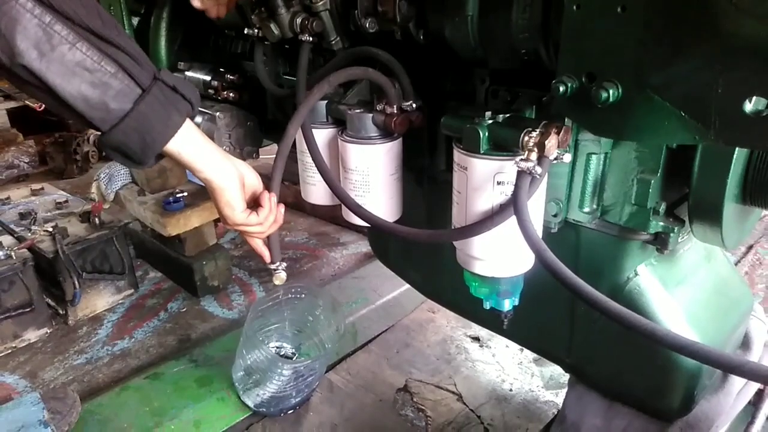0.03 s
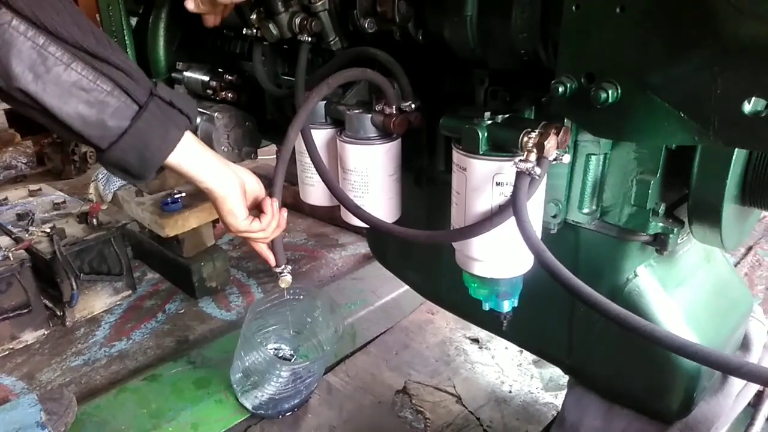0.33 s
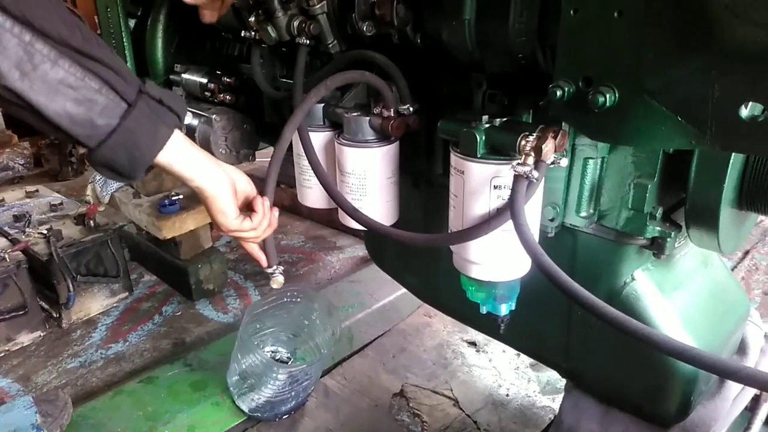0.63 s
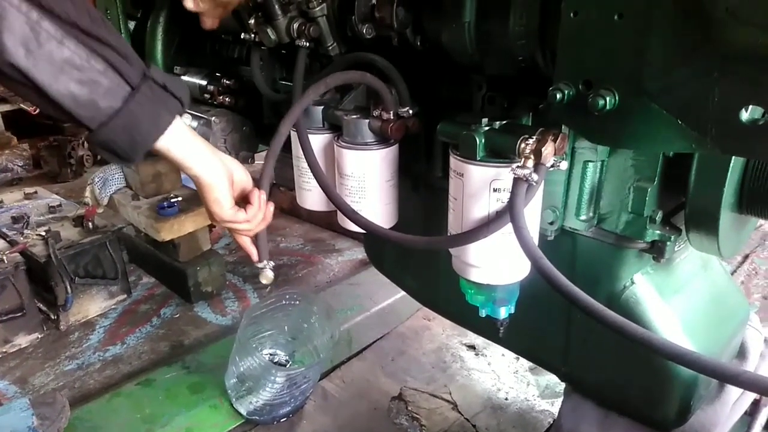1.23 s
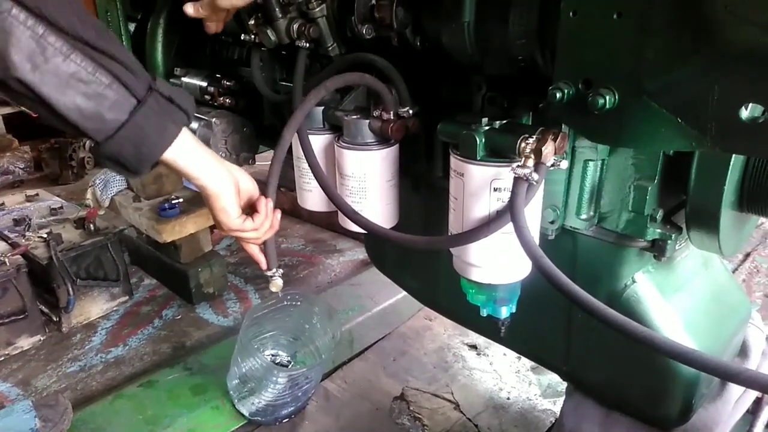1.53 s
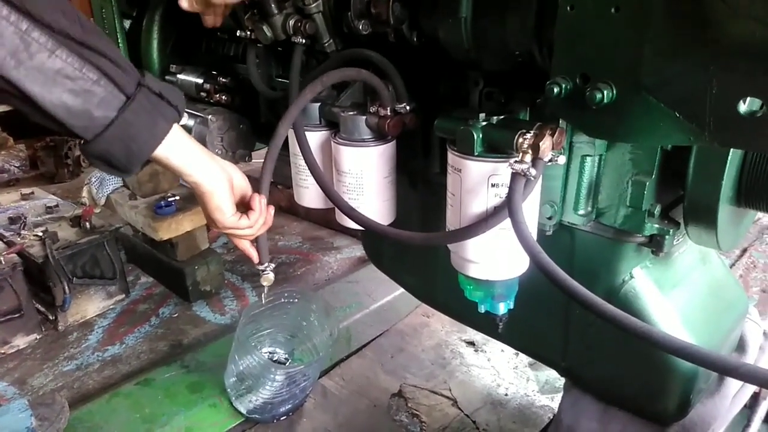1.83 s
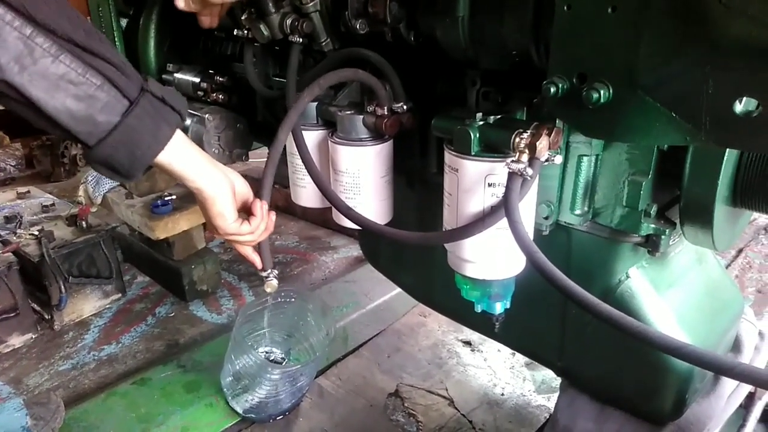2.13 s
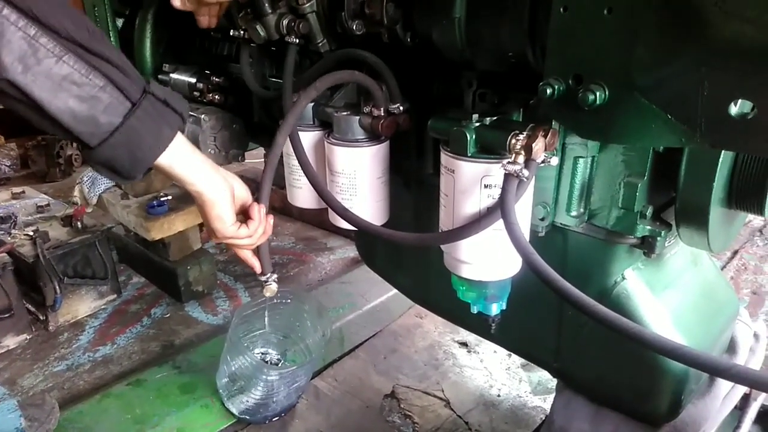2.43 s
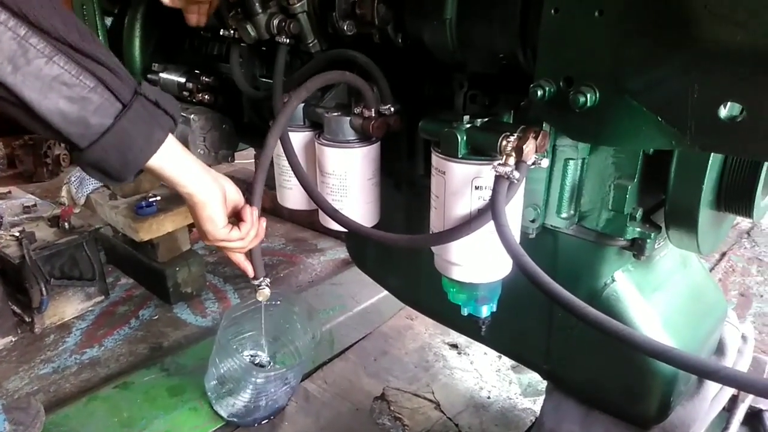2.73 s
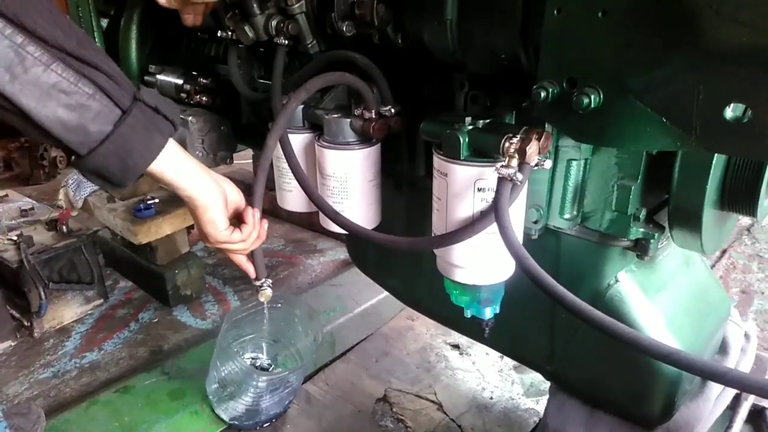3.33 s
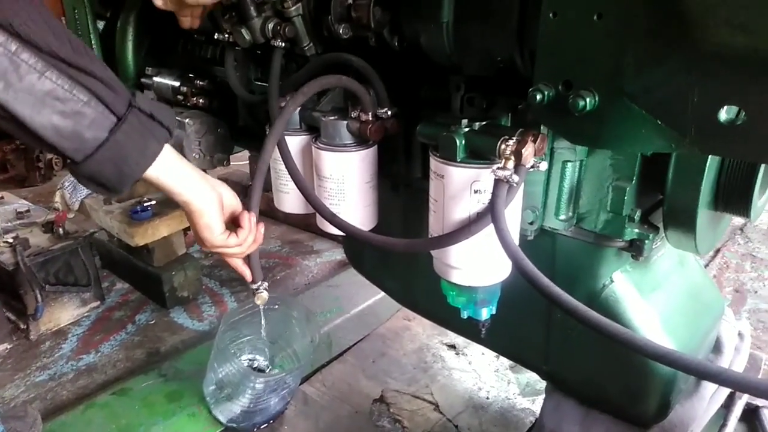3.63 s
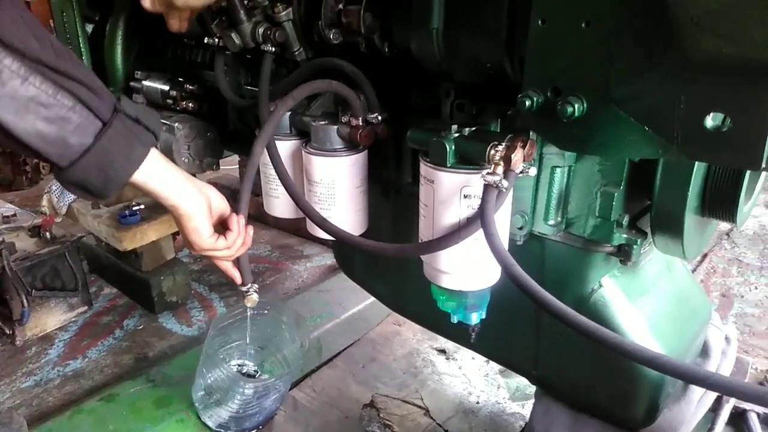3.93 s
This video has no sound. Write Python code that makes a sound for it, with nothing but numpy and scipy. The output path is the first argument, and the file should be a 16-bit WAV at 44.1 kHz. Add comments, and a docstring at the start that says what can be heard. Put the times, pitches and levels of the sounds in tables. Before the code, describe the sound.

Fuel sputters out of a hose into a nearby plastic bottle, first as soft drips, then as louder spits and pattering, gurgling gushes. A hand pump clicks and clunks throughout, over a workshop's faint low rumble.

```python
"""A hand pump sends fuel through a hose into a plastic bottle, beside a stopped engine in a workshop. The pump
clicks and clunks at each stroke, and now and then the bottle's body knocks. At first drops fall among faint
fizzes and small pops; after two seconds the hose spits loudly and the stream drums on the thin bottle. A low
rumble fills the room. All sit in the centre of the stereo image: the bottle close and dry, the pump with the
most room on it."""
import sys
import numpy as np
from scipy import signal
from scipy.fft import rfft, irfft, next_fast_len
from scipy.io import wavfile
from scipy.ndimage import uniform_filter1d

SR = 44100
rng = np.random.default_rng(int(sys.argv[2]) if len(sys.argv) > 2 else 0)


def pcm_store(signal):
    """Save signal as 16-bit PCM."""
    levels = np.round(np.clip(np.atleast_2d(signal), -1, 1) * 32767)
    wavfile.write(sys.argv[1], SR, levels.astype(np.int16).T)


N = 176400
TIME, AGE = np.arange(N) / SR, np.arange(SR // 2) / SR  # seconds into the scene, into one short sound
PEAK_S = .12  # age at which a short sound's envelope peaks
SPIT_RISE_S, DROPLET_FALL_S = .0008, .0011
BUBBLE_WOBBLE, GLIDE_PER_S = .059, 2  # as fractions of a bubble's pitch


def amp(db):
    """Decibels to gain."""
    return 10 ** (np.asarray(db) / 20)


def unit(x):
    """Scale to rms 1."""
    return x / np.sqrt(np.mean(x ** 2) + 1e-20)


def level(x, size):
    """Running rms over size samples."""
    return np.sqrt(np.abs(uniform_filter1d(x ** 2, size)) + 1e-20)


def along(points, hz):
    """Interpolate (Hz, value) points on a log frequency axis."""
    f, v = np.transpose(points)
    return np.interp(np.log(hz + 1), np.log(f + 1), v)


def curves(rows):
    """One value per sample for each column after the time."""
    s, *columns = np.transpose(rows)
    return [np.interp(TIME, s, column) for column in columns]


def coloured(x, points):
    """Minimum-phase filter with the gain of (Hz, dB) points."""
    m = 2 * next_fast_len(len(x))
    cepstrum = irfft(np.log(amp(along(points, np.fft.rfftfreq(m, 1 / SR)))))
    cepstrum[1:m // 2] *= 2
    cepstrum[m // 2 + 1:] = 0
    return irfft(rfft(x, m) * np.exp(rfft(cepstrum)))[:len(x)]


def add(track, s, db, sound):
    """Mix in a sound that peaks at time s, with its loudest 3 ms at db."""
    start = round((s - PEAK_S) * SR)
    sound = (amp(db) * sound / level(sound, size=132).max())[max(-start, 0):]
    part = track[max(start, 0):][:len(sound)]
    part += sound[:len(part)]


def envelope(rise_s, fall_s):
    """Exponential swell up to the peak, then exponential decay."""
    return np.exp(np.minimum((AGE - PEAK_S) / rise_s, (PEAK_S - AGE) / fall_s))


def wavering(hz, wobble, length):
    """Phase of a tone whose pitch trembles."""
    tremble = unit(uniform_filter1d(rng.standard_normal(length), size=30))
    return 2 * np.pi * np.cumsum(hz * (1 + wobble * tremble)) / SR


def room_tone(hum_hz=294, hum_db=-72.5, hiss_db=-70.5):
    """The workshop's background: a swelling low rumble, a faint hum and an even hiss."""
    swells = [(0, -56.5), (.73, -56), (1.15, -66), (1.3, -56.5), (1.62, -64), (1.78, -49), (2.1, -54.5),
              (4, -61)]  # course of the rumble: time_s, level_db
    rumble_spectrum = [(20, -20.5), (88, 3.5), (120, -1), (220, -15.5), (320, -23), (800, -57)]  # frequency_hz, gain_db
    hiss_spectrum = [(600, -6.5), (4500, -12), (14000, -15)]  # frequency_hz, gain_db
    db, = curves(swells)
    rumble = coloured(rng.standard_normal(N), rumble_spectrum)
    hum = amp(hum_db) * np.sin(2 * np.pi * hum_hz * TIME)
    hiss = amp(hiss_db) * unit(coloured(rng.standard_normal(N), hiss_spectrum))
    return amp(db) * rumble / level(rumble, size=9000) + hum + hiss


def in_room(x, wet_db, size=8820):
    """Direct sound reaches the microphone centred, with ever-changing echoes, wide only in the treble."""
    reverb_times = [(1500, 0.29), (6000, 0.26), (15000, 0.21)]  # decay of the workshop: frequency_hz, t60_s
    width = [(3000, -60), (4200, -18), (13000, -8)]  # stereo spread of the echoes: frequency_hz, side_db
    wet = np.zeros((2, N + SR))
    for start in range(0, N, size):  # each block gets new tails
        hz, t, noise = signal.stft(rng.standard_normal((2, len(AGE))), SR, nperseg=256)
        decay = amp(-60 * t / along(reverb_times, hz)[:, None])
        tails = signal.istft(noise * decay, SR, nperseg=256)[1][:, :len(AGE)]
        tails *= np.minimum(AGE / .001, 1)
        echo = signal.fftconvolve(x[None, start:start + size], tails / np.linalg.norm(tails[0]), axes=1)
        wet[:, start:start + echo.shape[1]] += amp(wet_db) * echo
    mid, side = wet[0, :N], coloured(wet[1, :N], width)
    return np.array([x + mid + side, x + mid - side])


def gurgle(count=700, size=2600, range_hz=(210, 490), fall_s=.007):
    """A crowd of large bubbles, each with its own rising pitch, at an even level."""
    jitter, pitch, gain = np.hsplit(rng.random((count, 3)), 3)
    hz, t = np.interp(pitch, [0, 1], range_hz), AGE[:size]
    tones = gain * t * np.exp(-t / fall_s) * np.sin(2 * np.pi * hz * t * (1 + GLIDE_PER_S * t / 2))
    at = ((np.arange(count)[:, None] + jitter) * N / count).astype(int) + np.arange(size)
    crowd = np.bincount(at.ravel(), tones.ravel(), N)[:N]
    return crowd / level(crowd, size)


def drumming(drops_per_s=160, rise_s=.03):
    """Each gush patters on the bottle, ringing its low modes, and churns the fuel inside."""
    modes = [(247, 16, 0), (320, 14, 5.5), (400, 15, -8), (448, 20, -14)]  # bottle resonances: pitch_hz, width_hz, gain_db
    gushes = [(1.778, -49.5, 0.044, -19), (2.106, -40.5, 0.11, -15), (2.333, -41, 0.12, -8),
              (2.766, -36, 0.053, -16), (2.919, -51, 0.074, -13), (3.146, -52, 0.12, -14),
              (3.32, -40.5, 0.065, -10), (3.652, -50.5, 0.05, -5), (3.809, -45.5, 0.26, -3.5),
              (3.987, -41, 0.14, 1)]  # surges of fuel: peak_s, level_db, decay_s, gurgle_over_drumming_db
    drops = (rng.random(N) < drops_per_s / SR) * rng.exponential(size=N)
    f = np.fft.rfftfreq(N, 1 / SR)
    body = sum((-1) ** k * amp(db) * 1j * f * width / (hz * hz - f * f + 1j * f * width)
               for k, (hz, width, db) in enumerate(modes))
    ring = irfft(rfft(drops) * body, N)
    s, db, fall_s, gurgle_db = np.transpose(gushes)[:, :, None]
    flow = amp(db) * np.exp(np.minimum((TIME - s) / rise_s, (s - TIME) / fall_s))
    flow /= np.hypot(1, amp(gurgle_db))  # patter and churn share the power
    patter = np.linalg.norm(flow, axis=0) * ring / level(ring, size=2600)
    churn = np.linalg.norm(flow * amp(gurgle_db), axis=0) * gurgle()
    return patter + churn


def bubble(hz, rise_s, fall_s, wobble=BUBBLE_WOBBLE):
    """A short trembling tone that rises as the bubble nears the surface."""
    gliding_hz = hz * (1 + GLIDE_PER_S * (AGE - PEAK_S))
    return envelope(rise_s, fall_s) * np.sin(wavering(gliding_hz, wobble, len(AGE)))


def plops():
    """Heavy drops fall in the bottle, each trapping one large bubble."""
    drops = [(0.15, 317.7, -50), (0.925, 418.6, -48.5), (0.956, 366, -48.5), (2.313, 390, -45.5),
             (2.701, 407, -49.5), (3.444, 430, -44), (3.55, 770, -59.5)]  # peak_s, pitch_hz, level_db
    out = np.zeros(N)
    for s, hz, db in drops:
        add(out, s, db, bubble(hz, rise_s=.0068, fall_s=.014, wobble=.16))
    return out


def pops():
    """Small bubbles pop and ring."""
    bubbles = [(0.093, 3420, -59), (0.443, 8450, -51.5), (1.288, 9700, -50.5), (1.913, 8650, -53),
               (2.016, 3020, -56.5), (2.183, 4640, -41), (2.7382, 3203, -28), (3.071, 4150, -47.5),
               (3.149, 9850, -52), (3.302, 3346, -38), (3.405, 3485, -39.5), (3.759, 2435, -50.5)]  # peak_s, pitch_hz, level_db
    out = np.zeros(N)
    for s, hz, db in bubbles:
        add(out, s, db, bubble(hz, rise_s=.0028, fall_s=.0045))
    return out


def squeak(octave_db=3):
    """Air squeaks through the wet hose end: a rough rising whistle with its octave."""
    whistle = [(2.95, 3324, -67.5), (2.985, 4050, -46), (3.02, 4500, -58)]  # time_s, pitch_hz, level_db
    hz, db = curves(whistle)
    phase = wavering(hz, wobble=.0575, length=N)
    sounding = (TIME > whistle[0][0]) & (TIME < whistle[-1][0])
    return amp(db) * (np.sin(phase) + amp(octave_db) * np.sin(2 * phase)) * sounding


def spatter(rise_s, fall_s, colour, per_s, ping_s=DROPLET_FALL_S, count=1800, size=300):
    """A cloud of tiny droplets, each a short ping of its own pitch and size."""
    jitter, pitch, _ = rng.random((count, 3)).T
    spread_db = 1.5 * np.minimum(rng.standard_normal(count), 2)
    onset = np.maximum(PEAK_S - 4 * rise_s, 0) + (np.arange(count) + jitter) / per_s
    gain = np.interp(onset, AGE, envelope(rise_s, fall_s), right=0) * amp(spread_db)
    heard = gain > gain.max() / 300
    hz, t = np.interp(pitch[heard, None], [0, 1], [900, 16000]), AGE[:size]
    ping_shape = t * np.exp(-t / ping_s) * (1 - t / t[-1])
    pings = gain[heard, None] * np.sin(2 * np.pi * hz * t) * ping_shape
    at = (onset[heard, None] * SR).astype(int) + np.arange(size)
    return coloured(np.bincount(at.ravel(), pings.ravel(), len(AGE))[:len(AGE)], colour)


def spray(strays=5, stray_hz=(3000, 10000), stray_fade_db=8):
    """Each spurt fizzes as a fine mist with crisp fat drops in it; stray droplets follow."""
    spurts = [(0.251, -49, 0.021), (0.682, -52, 0.02), (1.04, -47, 0.023), (1.417, -50, 0.022),
              (1.76, -54, 0.016), (2.155, -48.5, 0.053), (2.384, -38, 0.051), (2.699, -39, 0.049),
              (2.83, -53, 0.069), (3.322, -50.5, 0.046), (3.468, -57.5, 0.047), (3.65, -52.5, 0.035),
              (3.968, -50, 0.063)]  # peak_s, level_db, decay_s
    spectrum = [(700, -11), (1500, -5.5), (4500, -9), (5700, -11), (7500, 1), (9600, 3.5), (11500, -15),
                (16000, -10)]  # colour of the fizz: frequency_hz, gain_db
    out = np.zeros(N)
    for s, db, fall_s in spurts:
        rise_s = .37 * fall_s
        mist = spatter(rise_s, fall_s, spectrum, per_s=5000)
        fat_drops = spatter(rise_s, fall_s, spectrum, per_s=170, ping_s=.00015)
        add(out, s, db, unit(mist) + .5 * unit(fat_drops))
        for late, pitch in rng.random((strays, 2)):
            ping = bubble(np.interp(pitch, [0, 1], stray_hz), SPIT_RISE_S, 2 * DROPLET_FALL_S)
            add(out, s + 3 * late * fall_s, db - stray_fade_db * late, ping)
    return out


def spits():
    """Air and fuel spit from the hose end in sharp, dense bursts of droplets."""
    bursts = [(1.065, -46, 0.0023), (2.07, -28, 0.0035), (2.0895, -24, 0.0012), (2.103, -33, 0.0029),
              (2.394, -40, 0.0053), (2.429, -30.5, 0.0024), (2.715, -33.5, 0.0015), (2.74, -29.5, 0.0022),
              (2.783, -32, 0.004), (3.3, -38.5, 0.0052), (3.402, -38.5, 0.0016), (3.437, -42, 0.0023),
              (3.625, -41.5, 0.0028), (3.94, -36, 0.0028)]  # peak_s, level_db, decay_s
    spectrum = [(1300, -14.5), (2500, -11), (3900, 0.5), (5900, -6), (7400, 1.5), (9800, 2), (11500, -8.5),
                (16000, -22)]  # colour of a spit: frequency_hz, gain_db
    out = np.zeros(N)
    for s, db, fall_s in bursts:
        add(out, s, db, spatter(SPIT_RISE_S, fall_s, spectrum, per_s=8000))
    return out


def rattle(rise_s, fall_s, resonances, detune):
    """A short rattle of contact through a group of resonances."""
    contact = rng.standard_normal(len(AGE)) * envelope(rise_s, fall_s)
    return unit(coloured(contact, np.multiply(resonances, [detune, 1])))


def contacts(hits, lower, upper, rise_s, fall_s):
    """Each contact rings a lower and an upper group of damped resonances, never quite alike."""
    out = np.zeros(N)
    for s, db, upper_db in hits:
        detune = 1 + rng.uniform(-.035, .035)
        body = rattle(rise_s, fall_s, lower, detune)
        treble = rattle(rise_s, fall_s, upper, detune)
        add(out, s, db, body + amp(upper_db) * treble)
    return out


def pump():
    """The hand pump's strokes: sharp clicks, and duller clunks from its lever; a few clunks late on are knocks
    of the bottle's body."""
    clicks = [(.195, -56.5, -29), (.665, -46.5, -1.5), (.708, -46.5, -34), (.993, -43.5, -5),
              (1.203, -40, 4), (1.405, -47, -19), (2.03, -43, -3.5), (2.056, -32.5, 8), (2.3435, -30.5, -6),
              (2.63, -35.5, -3), (2.926, -49, -11), (3.007, -50.5, -16), (3.245, -31.5, -1.5),
              (3.8795, -28, 2), (3.901, -40, -15)]  # peak_s, level_db, upper_group_db
    clunks = [(.283, -38.5, 0.5), (.298, -35, -22), (.332, -33.5, -15.5), (1.078, -43, -5.5),
              (1.437, -46.5, -18), (1.449, -51, -31), (1.778, -51.5, -35), (2.68, -46.5, -27),
              (2.745, -38.5, -35), (2.795, -49, -4), (3.616, -51, 0), (3.953, -40, -31)]  # peak_s, level_db, upper_group_db
    # spectra of the lower and upper resonance groups: frequency_hz, gain_db
    click_lower = [(1080, -30), (1450, 1), (1700, -6), (2100, 6), (2450, -10), (2700, 0), (3050, -11),
                   (3500, -4), (5500, -30)]
    click_upper = [(5200, -44), (6300, -14), (7150, -5), (8000, -16.5), (9100, -16), (11500, -42.5),
                   (14400, -21.5), (16000, -49)]
    clunk_lower = [(40, -46), (150, 6.5), (680, -12.5), (930, 6.5), (1250, -5.5), (1550, 0), (2500, 2.5),
                   (3200, -15), (6000, -66)]
    clunk_upper = [(3200, -20), (5000, 0.5), (6800, -28), (7900, 0.5), (9200, -30), (16000, -21)]
    return (contacts(clicks, click_lower, click_upper, rise_s=.0019, fall_s=.0011)
            + contacts(clunks, clunk_lower, clunk_upper, rise_s=.0052, fall_s=.0023))


def scene():
    """Pump and hose in the workshop's echoes, the bottle's drumming dry, room tone beneath."""
    strokes = in_room(pump(), wet_db=0)
    fuel = in_room(spits() + spray() + pops() + squeak() + plops(), wet_db=-7)
    return strokes + fuel + drumming() + room_tone()


def record(dry):
    """The recorder keeps nothing above its band limit."""
    top_hz = 16100
    m = next_fast_len(N + SR // 2)
    return irfft(rfft(dry, m) * (np.fft.rfftfreq(m, 1 / SR) < top_hz), m)[:, :N]


dry = scene()
out = record(dry)
pcm_store(out)
```